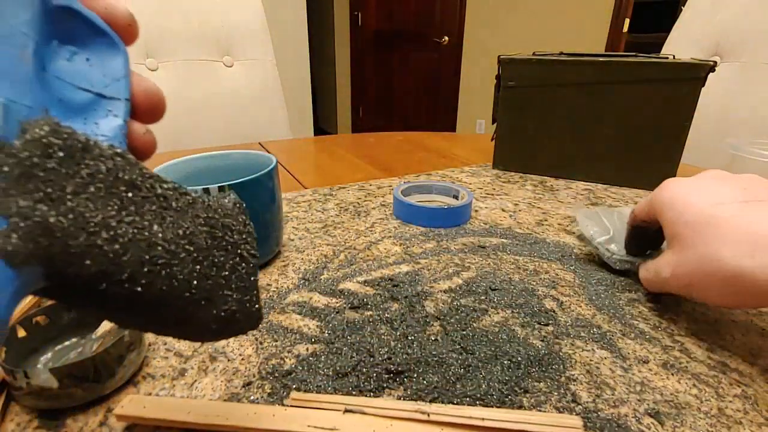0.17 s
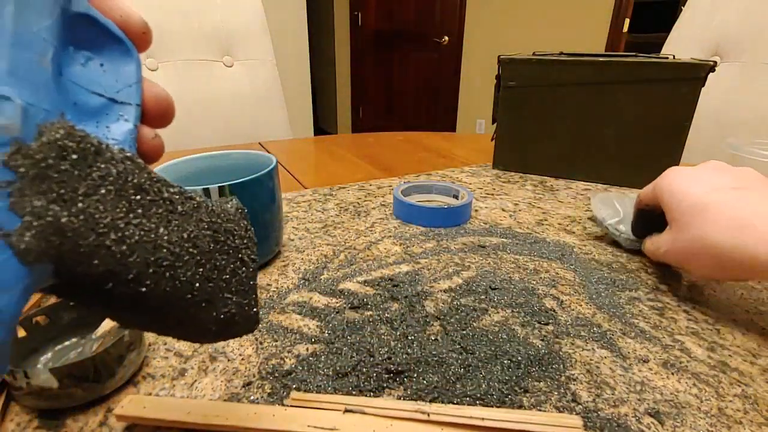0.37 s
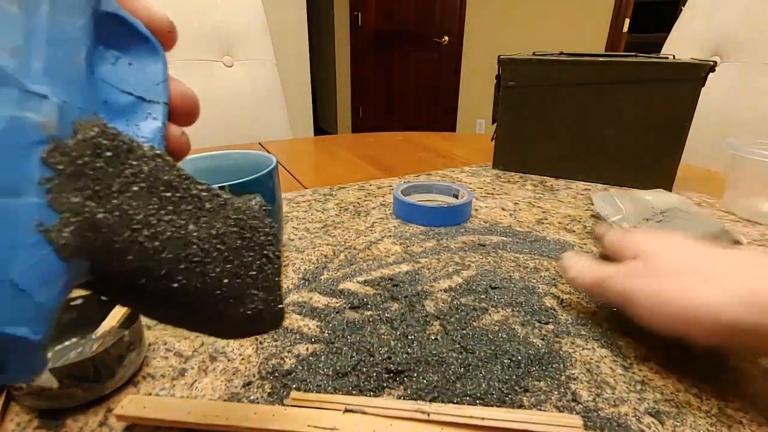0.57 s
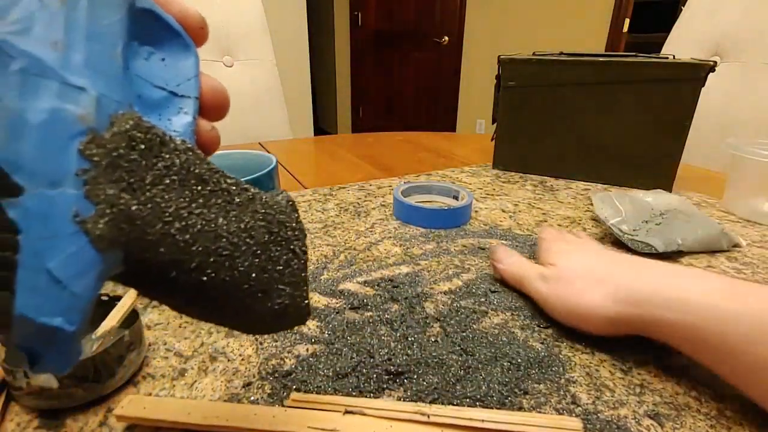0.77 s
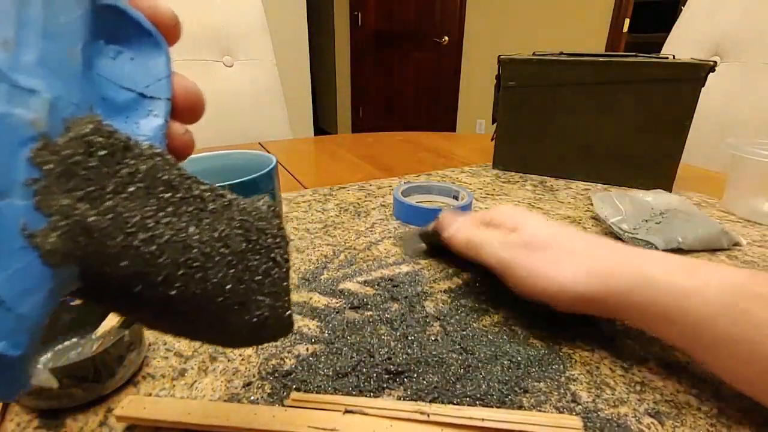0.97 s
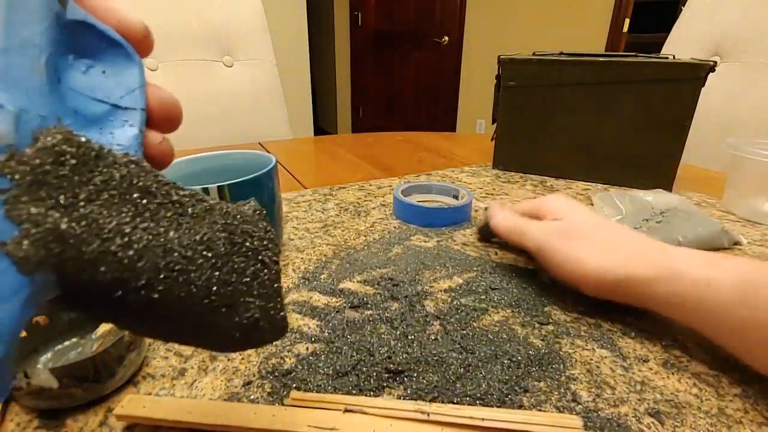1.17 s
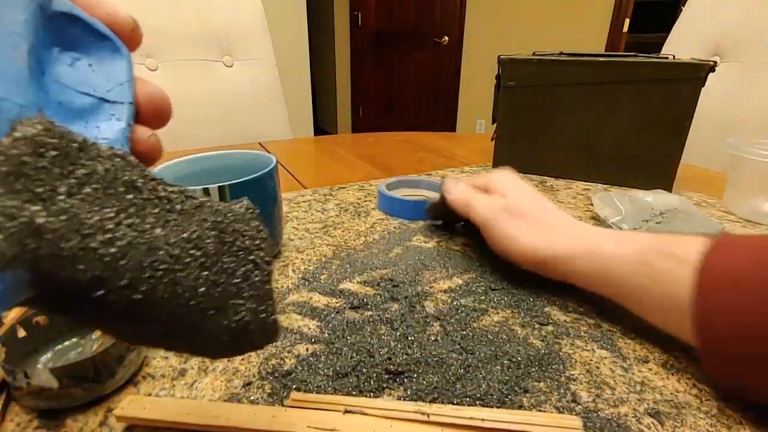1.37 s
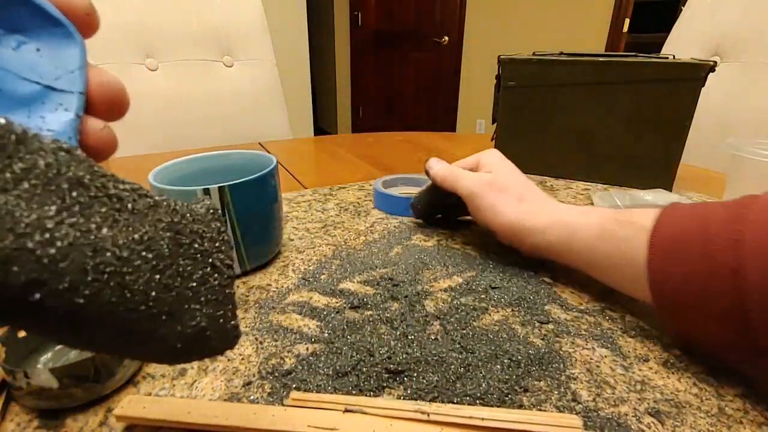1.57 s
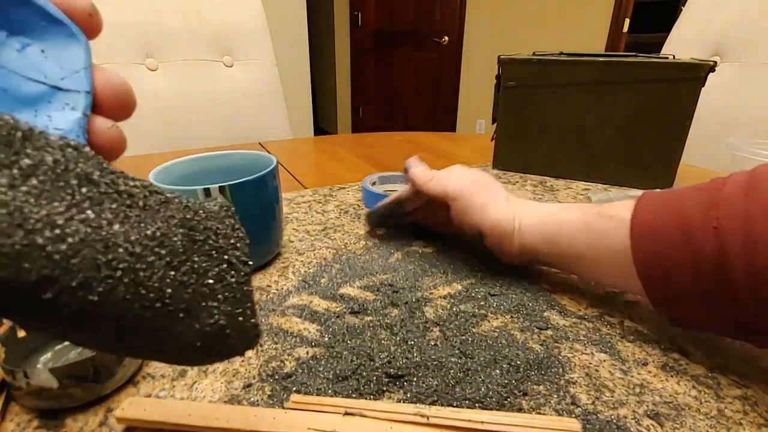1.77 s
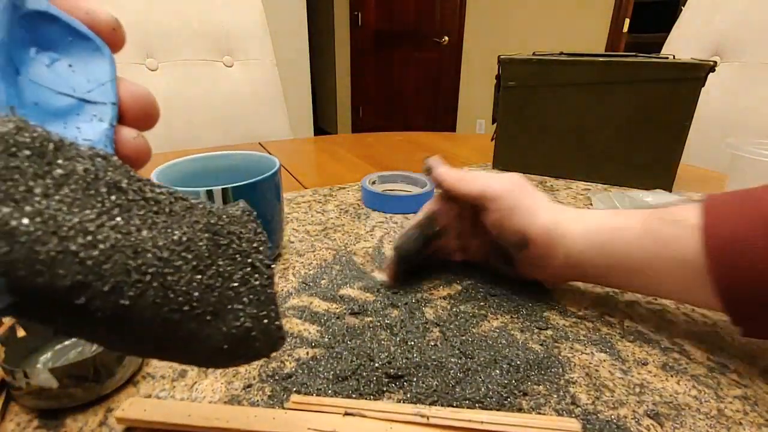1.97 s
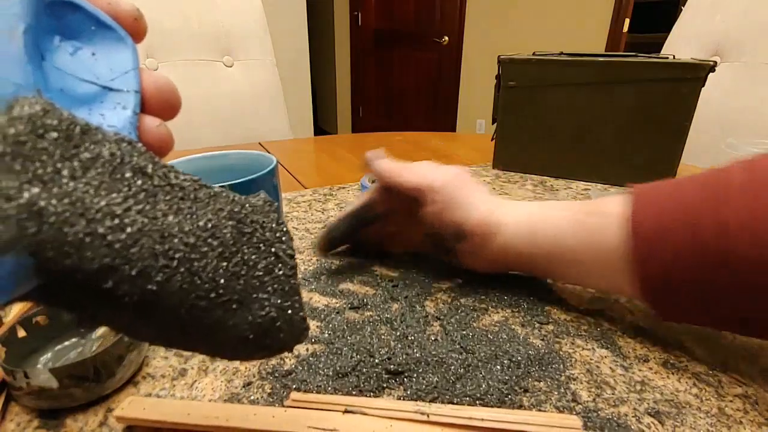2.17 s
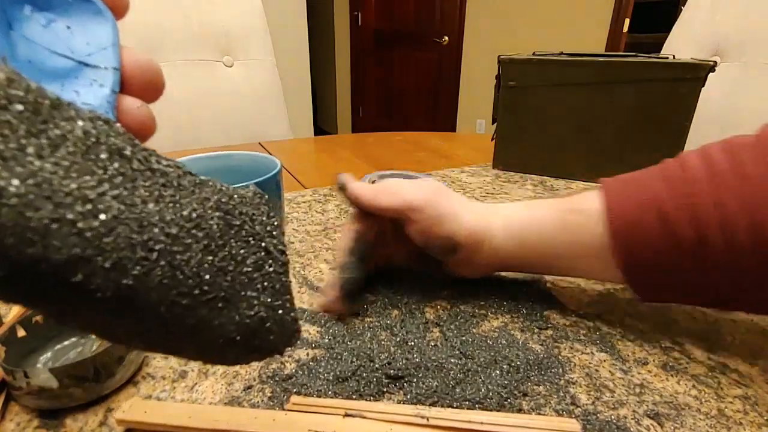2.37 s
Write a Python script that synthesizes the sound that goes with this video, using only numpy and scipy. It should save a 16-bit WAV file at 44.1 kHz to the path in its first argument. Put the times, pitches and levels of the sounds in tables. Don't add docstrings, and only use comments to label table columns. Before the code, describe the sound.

Fingers rake loose gritty powder over a stone counter in several quick, dry, hissing scrapes

```python
import sys
import numpy as np
from scipy import signal
from scipy.fft import rfft, irfft, next_fast_len
from scipy.io import wavfile
from scipy.ndimage import uniform_filter1d, map_coordinates

SR = 44100
rng = np.random.default_rng(int(sys.argv[2]) if len(sys.argv) > 2 else 0)


def how_loud(loudness_db):
    steps = np.asarray(loudness_db, float) / 20
    return 10 ** steps


def wav_out(sig):
    wavfile.write(sys.argv[1], SR, np.round(np.clip(np.atleast_2d(sig).T, -1, 1) * 32767).astype(np.int16))


N = 106986

# (time [s], speed as grit level [dB], pressure as slab ring over grit [dB])
RAKE_STROKES = [
    [(0, -38, 15), (.02, -53, 12.5), (.13, -58.5, 8.5), (.2, -47, -24), (.206, -46.5, -5), (.25, -43, 0.5),
     (.32, -45.5, 1.5)],
    [(.32, -50, -2), (.35, -40.5, 0), (.372, -25.5, -10), (.57, -21.5, -3.5), (.69, -29, -1.5),
     (.725, -36, -7), (.77, -46, -11), (.86, -49.5, 3)],
    [(.86, -53, -21), (.895, -41, 3), (.95, -31, 2.5), (1.01, -23.5, -4), (1.12, -23.5, -7.5),
     (1.185, -18, -14), (1.225, -25, -2), (1.255, -38.5, -6.5), (1.378, -48.5, -1)],
]
# (time [s], speed as grit level [dB], pressure as slab ring over grit [dB])
PUSH_STROKES = [
    [(1.378, -52, -7), (1.39, -42.5, 0.5), (1.43, -38.5, 8), (1.48, -23.5, -8.5), (1.53, -29, 2),
     (1.61, -31, 5.5), (1.65, -39.5, 9), (1.7, -50.5, 8.5), (1.8, -74.5, 22)],
    [(1.8, -57, -3), (1.806, -46.5, 6), (1.85, -37.5, 4), (1.92, -35.5, 7), (2.02, -26, -7.5)],
    [(2.02, -25.5, -3), (2.06, -21.5, -19.5), (2.13, -22.5, -10), (2.252, -29.5, -9.5), (2.275, -41, -12),
     (2.37, -54, -3)],
    [(2.37, -52, 11), (2.385, -34.5, -13), (2.4, -27.5, -6), (2.43, -22.5, -10.5)],
]
# (frequency [Hz], density [dB per Hz])
GRIT_COLOURS = [
    [(1800, -8), (2450, -17), (4300, -8.5), (8000, -9.5), (12000, -24)],
    [(1500, -3), (2500, -9), (4700, -3.5), (6500, -6.5), (12000, -14.5)],
    [(1300, -11.5), (2000, -11), (3000, -15), (7000, -17.5), (12000, -26.5)],
    [(1500, -1.5), (2300, -11), (3200, -7.5), (7200, -11), (12000, -19.5)],
    [(1750, -5.5), (2300, -7), (4500, -9), (7500, -9), (12000, -17)],
    [(1500, -1.5), (2400, -5.5), (5200, -2.5), (7800, 1), (9200, -8), (12000, -6.5)],
    [(1400, -5), (2200, -16.5), (6400, -6), (8500, -12.5), (12000, -19)],
]
# (left lag [ms], grain size spread [dB], slab pitch under the palm [ratio])
HAND_PLACES = [(0.25, 3.5, 0.95), (0.246, 1.85, 0.929), (0.19, 1.3, 1.027), (0.075, 2, 0.99),
               (0.02, 0.5, 1.03), (0.0055, 1.5, 1.02), (0.15, 0.5, 1.1)]
# (time [s], level [dB])
HAND_WEIGHT = [(0, -34.5), (.19, -52), (.21, -41.5), (.3, -43.5), (.6, -28.5), (.77, -49), (1.1, -37),
               (1.37, -55.5), (1.39, -43.5), (1.535, -39.5), (1.547, -24), (1.69, -31), (1.79, -53),
               (1.85, -33), (1.96, -26), (2.29, -44.5), (2.305, -42.5), (2.43, -40.5)]
# (frequency [Hz], width [Hz], level [dB])
SLAB_MODES = [(743, 183, -6), (867, 52, 0), (978, 148, -4), (1586, 82, -9), (1784, 66, -8.5)]
# (frequency [Hz], width [Hz], level [dB])
CABINET_MODES = [(59.5, 30, -6), (126.8, 45, 7), (191, 83, 1), (309, 124, 4.5), (410, 206, 1)]
# (frequency [Hz], width [Hz], level [dB])
THUMP_MODES = [(80.5, 39, -4), (158.6, 22, -2)]
# (frequency [Hz], width [Hz], level [dB])
ROLL_MODES = [(770, 170, -4), (985, 200, 0), (1500, 280, -9), (2080, 250, -15)]
# (time [s], knock level [dB], thump level [dB])
LANDINGS = [(.001, -33, -32.5), (0.2017, -36, -28), (.217, -36, -28), (1.385, -23.5, -31),
            (1.543, -19.5, -34), (2.297, -40, -27), (2.311, -34, -28), (2.326, -36, -34), (2.336, -43, -28),
            (2.356, -44, -32), (2.377, -29.5, -30.5)]
# (time [s], peak level [dB], pitch [Hz])
GRAIN_TICKS = [(.0573, -29, 7440), (0.151, -33, 8000), (0.1656, -23, 8300), (0.183, -33, 6500),
               (.203, -22.5, 3920), (.2325, -21, 4150), (0.2498, -22, 4630), (.2645, -24, 5100),
               (0.2772, -31, 8100), (.281, -19, 3370), (0.2953, -20, 4630), (.16, -33, 9000),
               (.2195, -32, 4500), (.241, -39, 5000), (.256, -33, 4700), (.27, -31, 4700),
               (.288, -36, 5200), (.3125, -32, 4700), (.317, -28, 4600), (.335, -31, 4670),
               (.3444, -25, 4130), (.35, -17.5, 4220), (.355, -25, 5500), (0.37, -15, 4340),
               (0.3915, -9, 4370), (.405, -6.5, 4750), (.415, -7.5, 4500), (1.739, -33, 5500),
               (0.801, -41, 4500), (1.8075, -21, 3480), (1.8662, -9, 6020), (1.8664, -28, 8400),
               (2.012, -10.5, 5000)]
# (time [s], peak level [dB], pitch [Hz])
CRUSHED_LUMPS = [(.2022, -26.5, 750), (.232, -31.5, 755), (.424, -25, 890), (.441, -21.5, 870),
                 (.482, -21.5, 724), (.513, -28, 860), (.534, -26, 725), (.547, -22, 950),
                 (.559, -19.5, 914), (.599, -29, 920), (.622, -24, 999), (.669, -24, 872),
                 (.83, -36.5, 990), (2.302, -35, 1174), (2.349, -35, 935), (2.3835, -33, 1100)]
# (time [s], pitch [Hz], level [dB])
GROAN_TRACKS = [
    [(1.54, 145, -39), (1.558, 149.4, -30), (1.586, 147.7, -37), (1.63, 123.4, -32.5),
     (1.686, 122.8, -25.5), (1.72, 127.6, -43), (1.728, 128, -36), (1.738, 133, -62), (1.76, 133, -47)],
    [(1.85, 113, -55), (1.862, 111.6, -39), (1.912, 125.9, -41), (1.974, 123.2, -33), (1.984, 121.3, -28),
     (2.042, 117.5, -38), (2.088, 122, -38), (2.1, 125, -71)],
]
# (pitch [ratio], level [dB])
GROAN_PARTIALS = [(1, -0.5), (1.66, -4.5), (2.7, -8.5)]
# (time [s], peak level [dB])
ROLL_SLIPS = [(1.5445, -12.5), (1.556, -15), (1.559, -15), (1.5675, -9.5), (1.578, -11.5), (1.59, -14.5),
              (1.596, -25), (1.611, -22), (1.62, -13), (1.628, -16.5), (1.637, -15.5), (1.648, -19),
              (1.664, -18.5), (1.69, -24.5), (1.847, -16), (1.876, -26), (1.894, -21.5), (1.906, -27),
              (1.929, -22), (1.94, -19.5), (1.961, -18.5), (2.012, -26), (2.04, -25), (2.414, -26.5)]
# (frequency [Hz], correlation [0..1])
STEREO_LIKENESS = [(60, 0.19), (150, 1), (500, 0.87), (800, 0.7), (1100, 0.36), (2500, 0.26),
                   (12000, 0.076)]
# (frequency [Hz], level [dB])
STEREO_LEAN = [(60, -4), (150, 1.5), (380, -1.5), (950, 0.5), (2380, -2.5), (5980, -6.5), (15000, 8)]
# (frequency [Hz], density [dB per Hz])
ROOM_TONE = [(30, -2.5), (75, 7), (260, -19.5), (520, -13.5), (900, -13.5), (1900, -8), (2450, -31),
             (4000, -27), (12000, -33.5)]
# (frequency [Hz], T60 [s])
ROOM_T60 = [(100, 0.22), (400, 0.38), (10000, 0.063)]

SLAB_ROUGH_DB, WEIGHT_ROUGH_DB, CLUMP_DB, PATCH_DB = 2, 2.2, 1, 2.1
TICK_T60_S, TICK_CRACK, TICK_DB = 0.0028, 0.7, 2.5
LUMP_T60_S, LUMP_DB = 0.032, 4.5
GROAN_DRIFT_SHARE, GROAN_DB, GROAN_ROUGH_DB = 0.05, 2, 3.2
ROLL_SLIP_DB, AIR_DB, ROOM_DB = 1, -47.5, -12
TOP_HZ, EDGE_HZ, SPARED_HZ = 15500, 12160, 14200
SPARED_DB, SPARED_SHARE, QUIET_LIFT = -11, 0.4, 0.2
FRAME_SAMPLES, SHIFT_SAMPLES = 2048, 760
WEAK_SHARE, TOP_WEAK_SHARE = 0.45, 1.15


def unit(x):
    return x / np.sqrt(np.mean(x ** 2) + 1e-20)


def along(points, hz):
    point_hz, values = np.transpose(points)
    return np.interp(np.log(hz + 1), np.log(point_hz + 1), values)


def curves(rows):
    time_s, *columns = np.transpose(rows)
    return [np.interp(np.arange(N) / SR, time_s, column, -120, -120) for column in columns]


def wobble(rate_hz):
    knots = rng.standard_normal(int(N * rate_hz / SR) + 4)
    return map_coordinates(knots, [np.arange(N) * rate_hz / SR])


def filtered(x, response):
    size = next_fast_len(N + SR // 2)
    spectrum = rfft(x, size) * response(np.fft.rfftfreq(size, 1 / SR))
    return irfft(spectrum, size)[..., :N]


def body(modes):
    def response(f):
        total = 0
        for k, (centre_hz, width_hz, db) in enumerate(modes):
            damping = 1j * f * width_hz
            total = total + (-1) ** k * how_loud(db) * damping / (centre_hz ** 2 - f * f + damping)
        return total
    return response


def grains(spread_db, size=1):
    draws = np.minimum(rng.exponential(size=N // size + 1), 4)
    sizes = np.repeat(how_loud(spread_db * draws), size)[:N]
    return rng.standard_normal((2, N)) * sizes


def patchy(pair, depth_db):
    z = signal.stft(pair, nperseg=512)[2]
    field = uniform_filter1d(rng.standard_normal(z.shape[1:]), 6, 0)
    field = uniform_filter1d(field, 8, 1)
    return signal.istft(z * how_loud(depth_db * unit(field)), nperseg=512)[1][:, :N]


def ports(pair, lag_ms):
    def spread(hz):
        angle = np.arccos(np.clip(along(STEREO_LIKENESS, hz), -1, 1)) / 2
        return np.array([np.cos(angle), np.sin(angle)])

    def lean_and_lag(hz):
        half = how_loud(along(STEREO_LEAN, hz) / 2) * np.exp(-1j * np.pi * hz * lag_ms / 1000)
        return np.array([half, 1 / half])

    mid, side = filtered(pair, spread)
    return filtered(np.array([mid + side, mid - side]), lean_and_lag)


def scattered(x, smear_db):
    t = np.arange(SR // 50) / SR
    smear = rng.standard_normal(len(t)) * how_loud(-60 * t / 0.025)
    copy = signal.fftconvolve(x, smear / np.linalg.norm(smear))[:N]
    return np.array([x, how_loud(smear_db) * copy])


def struck(events, response, extra_db=0):
    blows, one = np.zeros(N), filtered(np.eye(1, N)[0], response)
    for s, db in events:
        blows[round(s * SR)] = how_loud(db + extra_db)
    return filtered(blows, response) / np.abs(one).max()


def strokes():
    out = 0
    for rows, colour, place in zip(RAKE_STROKES + PUSH_STROKES, GRIT_COLOURS, HAND_PLACES):
        lag_ms, spread_db, ratio = place
        speed_db, press_db = curves(rows)
        clumps = how_loud(CLUMP_DB * wobble(60.42))

        def grit_shape(hz):
            return how_loud(along(colour, hz)) / (1 + (1150 / (hz + 1)) ** 8)

        def slab_shape(hz):
            return body(SLAB_MODES)(hz / ratio) / (1 + (600 / (hz + 1)) ** 5)

        crushed = patchy(grains(spread_db, size=12) * clumps, PATCH_DB)
        grit = unit(filtered(crushed, grit_shape))
        ring = unit(filtered(grains(SLAB_ROUGH_DB, size=60) * clumps, slab_shape))
        out = out + ports(how_loud(speed_db) * (grit + how_loud(press_db) * ring), lag_ms)
    return out


def weight():
    def upper_shape(hz):
        band = 1 / (1 + (hz / 540) ** 6) / (1 + (130 / (hz + 1)) ** 3)
        return body(CABINET_MODES[2:])(hz) * band

    def lower_shape(hz):
        return body(CABINET_MODES[:2])(hz) / (1 + (hz / 200) ** 4)

    level_db, = curves(HAND_WEIGHT)
    drag = grains(WEIGHT_ROUGH_DB, size=200)
    upper = unit(filtered(drag, upper_shape))
    lower = unit(filtered(drag[::-1], lower_shape))
    depth = np.clip(0.14 + (level_db + 34.5) / 12, 0.4, 1)
    return ports(how_loud(level_db) * (0.73 * upper + 0.85 * depth * lower), 0.1)


def air():
    noise = rng.standard_normal((2, N))
    tone = unit(filtered(noise, lambda hz: how_loud(along(ROOM_TONE, hz))))
    return how_loud(AIR_DB) * ports(tone, 0)


def landings():
    def soft(hz):
        return 1 / (1 + 1j * hz / 900) ** 2

    knocks = [(s, db) for s, db, _ in LANDINGS]
    thumps = [(s, db) for s, _, db in LANDINGS]
    land = struck(knocks, lambda hz: body(SLAB_MODES)(hz) * soft(hz))
    land = land + struck(thumps, lambda hz: body(THUMP_MODES)(hz) * soft(2 * hz))
    return ports(scattered(land, 2.5), 0.17)


def room(x):
    hz, t, z = signal.stft(rng.standard_normal((2, SR // 2)), SR, nperseg=256)
    decay = how_loud(-60 * t / along(ROOM_T60, hz)[:, None])
    tail = signal.istft(z * decay, SR, nperseg=256)[1]
    late = np.pad(x, (400, 0))[None]
    return signal.fftconvolve(late, tail / np.linalg.norm(tail[0]), axes=1)[:, :N]


def ticks():
    out, t = np.zeros(N + SR), np.arange(SR // 50) / SR
    onset = 1 - np.exp(-t / 0.000093)
    for s, db, hz in GRAIN_TICKS:
        crack = TICK_CRACK * hz / 7000 * rng.standard_normal(len(t))
        ping = np.sin(2 * np.pi * hz * t) + crack
        out[round(s * SR):][:len(t)] += how_loud(db + TICK_DB - 60 * t / TICK_T60_S) * ping * onset
    bright = filtered(out[:N], lambda hz: (1j * hz / (2200 + 1j * hz)) ** 3)
    return ports(scattered(bright, 1.5), 0.194)


def lumps():
    out, t = np.zeros(N + SR), np.arange(SR // 20) / SR
    onset = 1 - np.exp(-t / 0.00068)
    for s, db, hz in CRUSHED_LUMPS:
        decay = how_loud(db + LUMP_DB - 60 * t / LUMP_T60_S)
        out[round(s * SR):][:len(t)] += decay * np.sin(2 * np.pi * hz * t) * onset
    return ports(scattered(out[:N], -1), 0.2)


def groan():
    out = 0
    for rows in GROAN_TRACKS:
        hz, level_db = curves(rows)
        for ratio, db in GROAN_PARTIALS:
            drift = 1 + GROAN_DRIFT_SHARE * wobble(40.16)
            turns = np.cumsum(np.abs(hz) * ratio * drift) / SR
            level = how_loud(level_db + db + GROAN_DB + GROAN_ROUGH_DB * wobble(60))
            out = out + level * np.sin(2 * np.pi * turns)
    return ports(scattered(out, 2), 0.11)


def judder():
    roll = struck(ROLL_SLIPS, lambda hz: body(ROLL_MODES)(hz) ** 2, ROLL_SLIP_DB)
    return ports(scattered(roll, -12), 0.037)


def scene():
    near = strokes() + weight() + landings() + ticks() + lumps() + groan() + judder()
    return near + how_loud(ROOM_DB) * room(near.mean(0)) + air()


def thinned(x):
    padded = np.pad(x, ((0, 0), (SHIFT_SAMPLES, 0)))
    hz, t, z = signal.stft(padded, SR, window="cosine", nperseg=FRAME_SAMPLES)
    field = rng.standard_normal((len(hz) // 12 + 1, len(t)))
    field = np.repeat(field, 12, 0)[:len(hz)]
    f, size = hz[:, None], np.abs(z).mean(0)
    strength = size / (uniform_filter1d(size, size=24, axis=0) + 1e-12)
    spared = field + ((f - SPARED_HZ) / 620) ** 2 < SPARED_SHARE
    kept = spared * (strength > TOP_WEAK_SHARE)
    top = size[(hz > 12500) & (hz < 15000)].mean(0) + 1e-9
    lift = (top / top.max()) ** -QUIET_LIFT
    below = (strength > WEAK_SHARE) | (f < 1200)
    gain = np.where(f < EDGE_HZ + 150 * field[0], below, how_loud(SPARED_DB) * kept * lift)
    out = signal.istft(z * gain, SR, window="cosine", nperseg=FRAME_SAMPLES)[1]
    return out[:, SHIFT_SAMPLES:SHIFT_SAMPLES + N]


def low_pass(x):
    return signal.sosfilt(signal.butter(12, 15900, fs=SR, output="sos"), x)


def record(dry):
    limited = filtered(dry, lambda hz: hz < TOP_HZ)
    mix = thinned(limited)
    return low_pass(mix)


dry = scene()
out = record(dry)
wav_out(out)
```